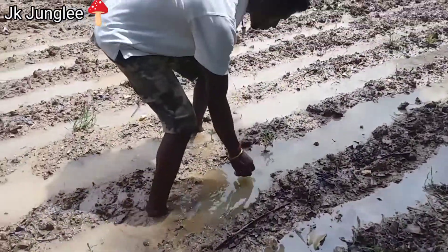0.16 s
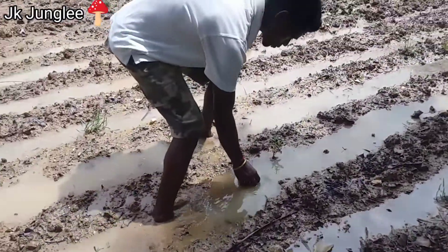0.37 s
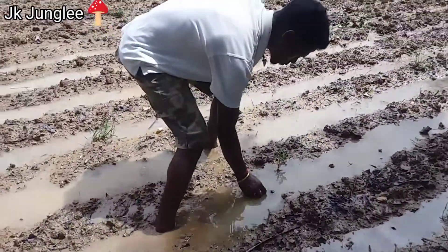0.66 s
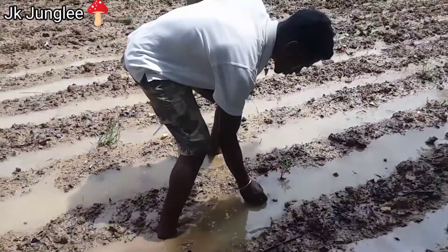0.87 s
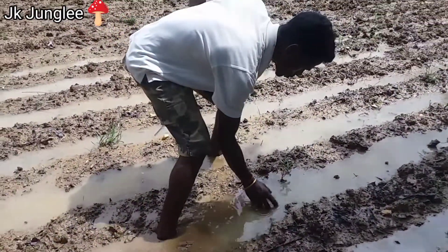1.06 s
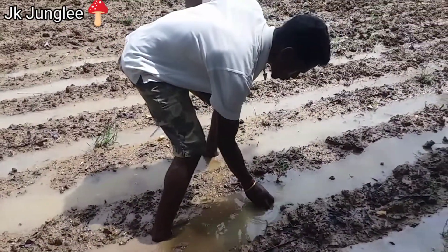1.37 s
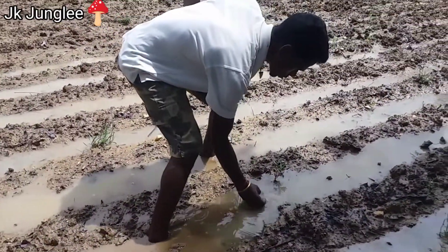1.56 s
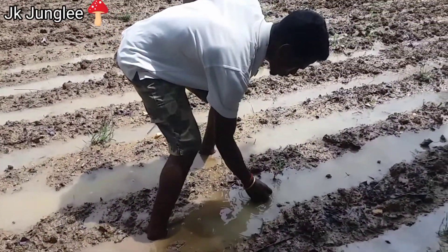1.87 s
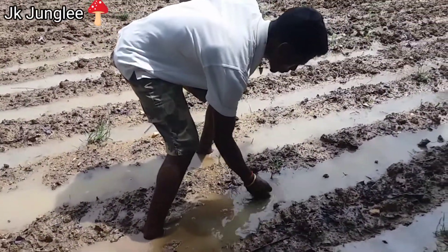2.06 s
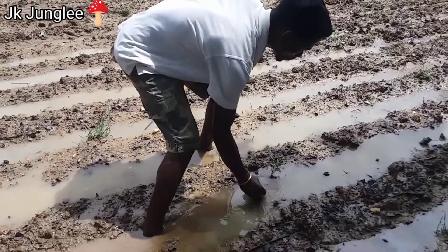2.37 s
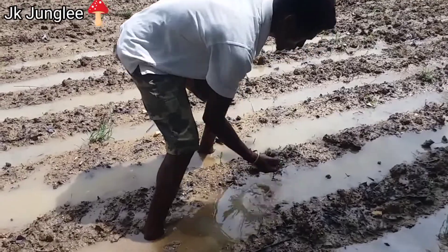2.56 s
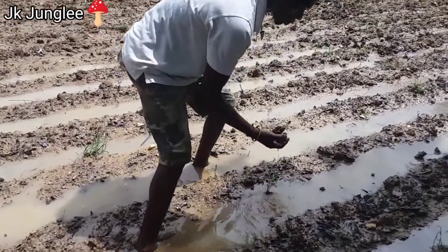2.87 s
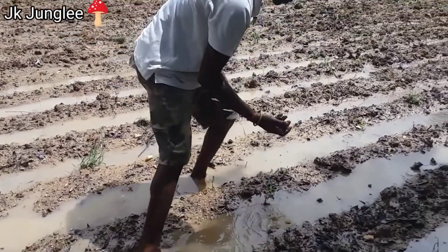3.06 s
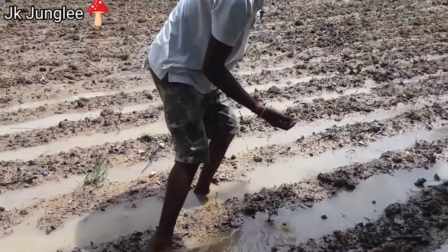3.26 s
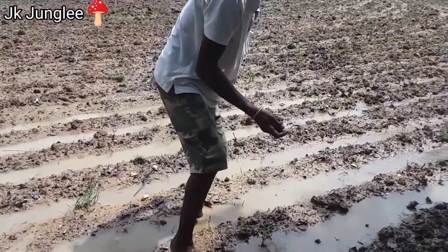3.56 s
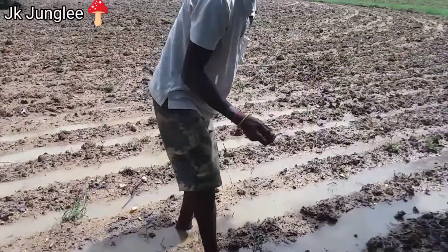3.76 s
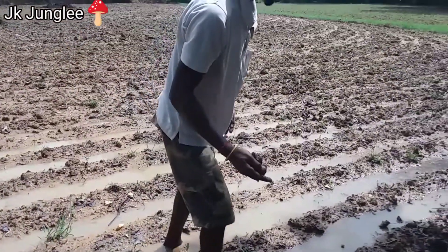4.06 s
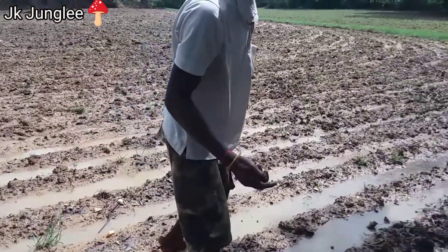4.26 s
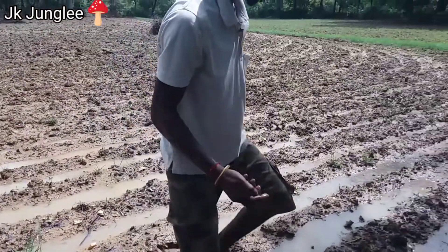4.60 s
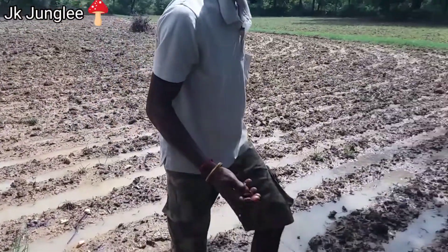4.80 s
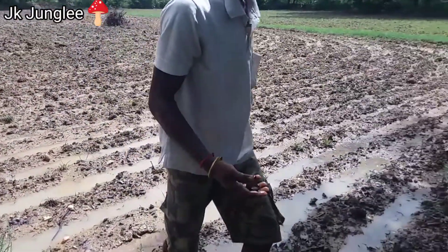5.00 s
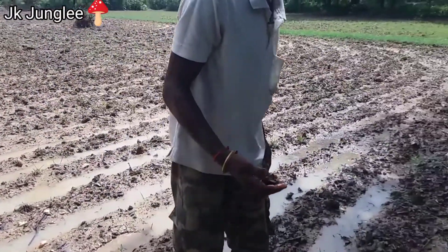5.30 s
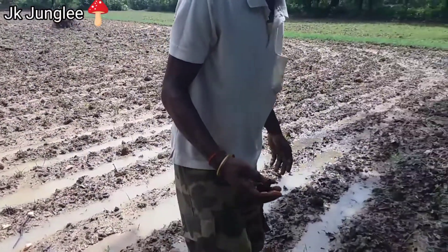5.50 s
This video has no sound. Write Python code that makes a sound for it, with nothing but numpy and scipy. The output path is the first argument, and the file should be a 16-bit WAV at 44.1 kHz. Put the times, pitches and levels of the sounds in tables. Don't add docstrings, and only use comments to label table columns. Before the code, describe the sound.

Calm outdoor ambience with high cricket chirps, a light breeze and distant bird whistles smeared by trees. One small drop ticks early. Past three seconds, bare feet push through shallow muddy water close to the handheld phone: sharp wet pops, a hard glugging knock, short gurgles and bright droplets, in uneven bursts to the end.

```python
import sys
import numpy as np
from scipy import signal
from scipy.fft import rfft, irfft
from scipy.io import wavfile
from scipy.ndimage import uniform_filter1d

SR = 44100
rng = np.random.default_rng(int(sys.argv[2]) if len(sys.argv) > 2 else 0)


def inscribe(sig):
    pcm = np.round(np.clip(np.atleast_2d(sig).T, -1, 1) * 32767)
    wavfile.write(sys.argv[1], SR, pcm.astype(np.int16))


def linear_from_db(decibels):
    return 10 ** (np.asarray(decibels, float) / 20)


N = 248724


def colour(x, points):
    hz, db = np.transpose(points)
    bins = np.log(np.arange(N // 2 + 1) * SR / N + 1)
    return irfft(rfft(x) * linear_from_db(np.interp(bins, np.log(hz), db)), N)


def level(x, db):
    return x * linear_from_db(db) / np.sqrt(np.mean(x ** 2))


def band(hz, width):
    sos = signal.butter(2, [hz - width / 2, hz + width / 2], "band", fs=SR, output="sos")
    return level(signal.sosfilt(sos, rng.standard_normal(N)), 0)


def walk(rate):
    hold = int(SR / rate)
    steps = np.repeat(rng.standard_normal(N // hold + 1), hold)
    return 1.95 * uniform_filter1d(uniform_filter1d(steps, hold), hold)[:N]


def air():
    # hz, density_db (per Hz)
    hush = [(76, -45), (130, 2), (340, 0), (600, -4.5), (1000, -6.5), (1600, -8), (2100, -4), (2830, -12),
            (4480, -16.5), (6300, -13.5), (7300, -30), (8200, -23), (9500, -21.5), (11500, -13.5),
            (15000, -14.5)]
    # time_s, lift_db
    breeze = [
        (0, 4.5),
        (.35, 1),
        (.6, 0),
        (5.64, 2.5),
    ]
    s, lift_db = np.transpose(breeze)
    lift = linear_from_db(np.interp(np.arange(N) / SR, s, lift_db))
    return level(colour(rng.standard_normal(N), hush), -57.5) * lift


def wind():
    # hz, density_db (per Hz)
    wind_colour = [(25, -46), (45, -7), (65, 2), (100, 2), (160, -8), (300, -55), (600, -60)]
    # middle_s, length_s, level_db
    gusts = [
        (0.147, 0.3, -55.5),
        (1.185, 0.084, -45),
        (1.39, 0.18, -62),
        (2.585, .2, -64.5),
        (3.995, 0.085, -61),
        (4.416, 0.21, -58),
        (4.666, 0.094, -50.5),
        (5.553, 0.14, -62),
    ]
    rumble = colour(rng.standard_normal(N), wind_colour)
    rumble /= np.sqrt(uniform_filter1d(rumble ** 2, size=3000))
    t = np.arange(N) / SR
    calm_db = -62.5
    swell = linear_from_db(calm_db)
    for mid, length, db in gusts:
        swell = swell + linear_from_db(db) * np.exp(-(2 * (t - mid) / length) ** 2)
    return swell * linear_from_db(1.7 * walk(21.98)) * rumble


def chirps(table, length, hz, width, strokes_hz, sharp, uneven, sweep):
    out, blur = np.zeros(N), band(hz, width)
    for mid, db in table:
        span = slice(int((mid - length) * SR), int((mid + length) * SR))
        t = np.arange(span.start, span.stop) / SR - mid
        phase = np.pi * strokes_hz * t
        strokes = np.abs(np.cos(phase)) ** sharp * (1 + uneven * np.cos(phase))
        wing = np.sin(2 * np.pi * hz * t + sweep * np.cos(2 * phase)) + .5 * blur[span]
        envelope = np.exp(-(2 * t / length) ** 4)
        out[span] += linear_from_db(db + 1.0) * envelope * strokes * wing
    return out


def crickets():
    # middle_s, level_db
    high_cricket = [(.46, -61), (.98, -62.5), (1.5, -58), (1.94, -57), (2.4, -64), (2.87, -59),
                    (3.33, -57.5), (3.78, -59.5), (4.25, -57.5), (4.84, -61), (5.38, -61)]
    # middle_s, level_db
    low_cricket = [
        (.755, -62),
        (1.64, -60.5),
        (2.57, -64),
        (3.469, -59),
        (4.469, -60),
        (5.247, -56),
    ]
    # middle_s, length_s, change_db
    lulls = [
        (.43, 0.11, -6),
        (0.817, 0.29, -7.5),
        (1.363, 0.27, -4),
        (1.803, 0.048, -2),
        (2.083, 0.11, -6.5),
        (2.393, 0.18, -0.5),
        (2.947, 0.19, -1),
        (3.8, 0.15, 0.5),
    ]
    t = np.arange(N) / SR
    pair_gap_s, second_db = .128, 1
    pairs = low_cricket + [(s + pair_gap_s, db + second_db) for s, db in low_cricket]
    near = chirps(high_cricket, .12, hz=7200, width=500, strokes_hz=68, sharp=4.0, uneven=.3, sweep=3)
    near += chirps(pairs, .09, hz=6290, width=300, strokes_hz=88, sharp=2.5, uneven=0, sweep=1.2)

    trill_db = -72 - 20.0 * (t - .9) ** 2 + 5.0 * np.cos(2 * np.pi * 14 * t)
    trill = linear_from_db(trill_db) * band(2810, 120)

    lull_db = sum(db * np.exp(-(2 * (t - mid) / length) ** 2) for mid, length, db in lulls)
    chorus = linear_from_db(-63 + lull_db + 0.92 * walk(60)) * band(5610, 680)
    chorus += linear_from_db(-70.5 + 2.0 * walk(29.55)) * band(7016, 560)
    return near + trill + chorus


def whistle(note, start, lift_db):
    s, hz, db = np.transpose(note)
    t = np.arange(s[0], s[-1], 1 / SR)
    edge = np.clip(np.minimum(t - s[0], s[-1] - t) / 0.0015, 0, 1)
    pitch = uniform_filter1d(np.interp(t, s, hz), size=600, mode="nearest")
    tone = np.sin(2 * np.pi * np.cumsum(pitch) / SR)
    out, first = np.zeros(N + 2 * SR), int((1 + start + s[0]) * SR)
    out[first:first + len(t)] = edge * linear_from_db(np.interp(t, s, db) + lift_db) * tone
    return out[:N + SR]


def bird():
    # time_s (from the song's start), pitch_hz, level_db
    song = [
        [(0, 2036, -57), (.03, 2010, -48), (.08, 1880, -54), (.12, 2012, -44), (.16, 1957, -48),
         (.19, 1751, -50), (.22, 1620, -59)],
        [(.37, 2053, -49), (.4, 2245, -53.5), (.44, 2185, -48.5), (.48, 1980, -48.5), (.505, 1694, -47.5),
         (.53, 1419, -59), (.56, 1277, -57)],
        [(.59, 1844, -51), (.635, 1804, -45.5), (.67, 1725, -54), (.7, 1580, -63.5)],
    ]
    # start_s, then the lift_db of each note
    sings = [
        (-.384, 3.4, 3.7, 4),
        (1.258, 2.6, 2.4, -0.5),
        (2.85, 1.1, 2, -2.5),
    ]
    # start_s, length_s, from_hz, to_hz,
    # level_db
    far_bird = [
        (0.419, .06, 1550, 1396, -60),
        (2.611, 0.2, 2180, 2263, -59),
        (2.772, 0.029, 2200, 1940, -55),
        (2.866, 0.22, 2070, 2070, -59),
        (3.251, 0.183, 2290, 2250, -56),
        (4.048, 0.22, 2260, 2240, -57),
        (5.513, 0.14, 2250, 2410, -50.5),
    ]
    out = np.zeros(N + SR)
    for start, *lifts in sings:
        for note, db in zip(song, lifts):
            out += whistle(note, start, db)
    for start, length, from_hz, to_hz, db in far_bird:
        middle_hz = (from_hz + 2 * to_hz) / 3
        glide = [(0, from_hz, -5), (length / 2, middle_hz, 0), (length, to_hz, -5)]
        out += whistle(glide, start, db)

    t = np.arange(2 * SR) / SR
    t60_s, slap_s, smear_db, slap_db = 1.4, .29, -2.5, -15.5
    fade = np.exp(-np.log(1000) * t / t60_s) * (t > .004)
    slap = np.exp(-((t - slap_s) / .03) ** 2)
    shape = linear_from_db(smear_db) * fade / np.sqrt(np.sum(fade ** 2))
    shape += linear_from_db(slap_db) * slap / np.sqrt(np.sum(slap ** 2))
    echo = np.zeros(N)
    for _ in range(4):
        sway = np.resize(walk(130), len(out))
        echo += signal.fftconvolve(out * sway, shape * rng.standard_normal(len(t)))[SR:N + SR] / 2
    flutter = linear_from_db(2.4 * walk(90))
    return out[SR:] * flutter + echo


def ring(events, glide, rise, fall, size=N):
    out = np.zeros(size + 2 * SR)
    for s, db, hz, cycles in events:
        before, after = int(2 * rise * cycles / hz * SR), int(6 * fall * cycles / hz * SR)
        u = np.arange(-before, after) * hz / SR / cycles
        shape = np.exp(np.where(u < 0, -(u / rise) ** 2, -u / fall))
        start = SR + int(s * SR) - np.sum(u < 0)
        tone = np.cos(2 * np.pi * cycles * u * (1 + glide * u / 2))
        out[start:start + len(u)] += linear_from_db(db) * shape * tone
    return out[SR:SR + size]


def swarm(low_hz, high_hz, rate):
    for hz in np.geomspace(low_hz, high_hz, num=8):
        when, size, sign = rng.random((3, int(rate / 8 * N / SR)))
        size_db = np.minimum(-3.2 * np.log(1 - size), 11)
        yield hz, np.bincount((when * N).astype(int), linear_from_db(size_db) * np.sign(sign - .5), N)


def stir():
    # start_s, hold_s, level_db, depth_db, spatter_db
    sloshes = [(2.452, 0.17, -67.5, 8.5, 6), (3.046, 0.028, -61, -19, 11.5), (3.143, .02, -52, -11, -6),
               (3.216, 0.057, -46.5, -9, -6), (3.288, 0.28, -48.5, 4, 0), (3.84, 0.13, -50, -8, -7),
               (3.969, 0.11, -47, -6, -12), (4.135, 0.086, -55, -12, -7), (4.296, 0.0076, -32, 0, -8),
               (4.32, 0.035, -47, 1, 0.5), (4.409, 0.019, -49.5, 1, 0), (4.478, .02, -48, -2, -2),
               (4.504, 0.015, -40, -5.5, -3), (4.585, 0.14, -54.5, -26, 2.5),
               (4.948, 0.071, -49.5, -28, 7.5), (5.023, .08, -50.5, 3, -6), (5.126, 0.15, -48.5, -8.5, -6),
               (5.355, 0.055, -46, -3, -6), (5.441, 0.038, -43, 1.5, -8), (5.483, 0.044, -46.5, -9, -9),
               (5.559, 0.055, -51.5, -6, 0.5)]
    attack_s, release_s = 0.002, 0.047
    t, power = np.arange(N) / SR, np.zeros((4, N))
    for start, hold, db, depth_db, spatter_db in sloshes:
        rise = np.clip((t - start) / attack_s, 0, 1)
        decay = np.exp(-np.maximum(t - start - hold, 0) / release_s)
        swarm_db = db + np.array([[depth_db], [0], [0.83 * spatter_db], [spatter_db]])
        power += (linear_from_db(swarm_db) * rise * decay) ** 2
    return np.sqrt(power)


def wash():
    # low_hz, high_hz, births_per_s, ring_cycles, offset_db
    swarms = [
        (505, 1170, 600, 2.8, -7),
        (1157, 2536, 950, 5.6, -3.5),
        (3040, 6080, 1100, 6, -9),
        (8400, 19000, 2200, 1.9, -16),
    ]
    out, start = np.zeros(N), int(2.4 * SR)
    for gain, (low_hz, high_hz, rate, cycles, offset_db) in zip(stir(), swarms):
        crowd = np.zeros(N - start)
        for hz, kicks in swarm(low_hz, high_hz, rate):
            one = ring([(.01, 0, hz, cycles)], glide=0.099, rise=0.25, fall=0.82, size=SR // 25)
            crowd += signal.oaconvolve(kicks[start:], one)[:N - start]
        swell = gain * linear_from_db(offset_db + 2.0 * walk(35))
        out[start:] += swell[start:] * level(crowd, 0)
    return out


def shed(events, later_s, octaves, below_db):
    wait, step = rng.random((len(events), 2)).T
    s, db, hz, cycles = np.transpose(events)
    pitch = hz * 2 ** (octaves * (step - .5))
    return np.transpose([s + later_s * wait, db - below_db, pitch, 1.46 * cycles])


def spray():
    # start_s, peak_db
    ticks = [(2.689, -42.5), (3.301, -42.5), (3.432, -48), (3.49, -48), (3.517, -45), (3.5882, -42),
             (3.687, -48.5), (3.893, -48), (3.987, -49), (4.0302, -49), (4.0528, -44), (4.13, -48),
             (4.169, -50.5), (4.296, -40), (4.5176, -39.5), (4.958, -36.5), (5.026, -46), (5.072, -49),
             (5.486, -50)]
    out, n = np.zeros(N), np.arange(600)
    sos = signal.butter(1, [3000, 14000], "band", fs=SR, output="sos")
    for s, db in ticks:
        burst = rng.standard_normal(600) * np.exp(-n / (.0025 * SR)) * np.minimum(n / 40, 1)
        start = int(s * SR)
        out[start:start + 600] += linear_from_db(db + 5) * signal.sosfilt(sos, burst)[:N - start]
    return out


def water():
    # crest_s, peak_db, pitch_hz, length_cycles
    pockets = [(3.1668, -38, 1430, 3), (3.2172, -19.5, 1007, 2.7), (3.2646, -16, 1080, 2.4),
               (3.279, -32, 880, 2.6), (3.298, -35.5, 795, 4.5), (3.3304, -38.5, 330, 2.7),
               (3.3644, -39.5, 690, 10), (3.4347, -34, 1080, 2.7), (3.4586, -28.5, 940, 4.7),
               (3.6377, -31.5, 1300, 2.5), (3.8951, -36.5, 1040, 2.8), (3.9894, -33.5, 1040, 5.2),
               (4.2972, -18.5, 1000, 1.55), (4.2975, -35, 200, 0.42), (4.3052, -37, 1250, 8.9),
               (4.3147, -22, 1420, 1.6), (4.3446, -33.6, 503, 3.1), (4.3566, -32, 1100, 3),
               (4.3636, -35.5, 400, 1.4), (4.379, -34, 1290, 3.9), (4.412, -36, 1010, 3),
               (4.5172, -20.5, 1060, 2.2), (4.5287, -26, 1040, 2.7), (4.5691, -38, 1100, 6.6),
               (4.605, -34.5, 1150, 4.7), (5.2087, -34.5, 1190, 1.5), (5.3828, -39.5, 894, 6.5),
               (5.4341, -34.5, 1020, 3.9), (5.4486, -28.5, 547, 1.7), (5.481, -36.5, 850, 5.5)]
    # crest_s, peak_db, pitch_hz
    bubbles = [(2.494, -48.5, 1680), (2.558, -45.5, 2530), (3.1533, -24, 1860), (3.2346, -27, 1800),
               (3.2547, -40, 2130), (3.283, -29.5, 2030), (3.3584, -39, 2000), (3.4796, -37, 2650),
               (3.7112, -41.5, 2520), (3.87, -40, 1630), (3.912, -39, 1590), (3.9331, -40, 2500),
               (3.9706, -38, 1990), (4.009, -30, 1740), (4.0324, -33, 2320), (4.298, -22, 2360),
               (4.5051, -39, 2480), (4.9532, -32.5, 1720), (4.9875, -31.5, 2320), (5.02, -38, 2000),
               (5.0334, -33.5, 2220), (5.055, -36.5, 1940), (5.0824, -41, 1980), (5.162, -41.5, 1420),
               (5.2448, -35, 2200), (5.3626, -25, 1910), (5.4135, -32, 2000), (5.447, -31, 1660)]
    # crest_s, peak_db, pitch_hz
    drops = [(.145, -45, 3270), (2.33, -54, 3440), (2.6928, -35, 4200), (2.905, -38, 4600),
             (3.074, -31.5, 5100), (3.4112, -39, 4070), (3.515, -34, 4430), (3.5908, -35, 3300),
             (3.491, -30.5, 4830), (3.64, -42, 2840), (3.6887, -37, 4080), (3.9141, -36.5, 4430),
             (3.9954, -32.5, 4160), (4.104, -40.5, 4000), (4.299, -29, 4300), (4.3174, -29.5, 4490),
             (4.3653, -33, 4200), (4.4, -38, 4460), (4.4875, -36.5, 3950), (4.53, -37, 4660),
             (4.959, -30, 5300), (4.9664, -31, 5040), (4.9792, -29, 5700), (5.0293, -32, 4950),
             (5.561, -39, 5000)]
    bubble_cycles, drop_cycles = 4.5, 4.9
    pops = pockets + [(*row, bubble_cycles) for row in bubbles] + [(*row, drop_cycles) for row in drops]
    out = ring(pops, glide=0.086, rise=0.5, fall=0.5) + wash()
    fragments = shed(pops, later_s=.008, octaves=1.0, below_db=8.5)
    out += ring(fragments, glide=0.072, rise=0.54, fall=0.28)
    out += spray()
    t = np.arange(SR // 10) / SR
    smear = rng.standard_normal(len(t)) * np.exp(-np.log(1000) * t / 0.046) * (t > .0015)
    smear /= np.sqrt(np.sum(smear ** 2))
    return out + linear_from_db(-8.5) * signal.fftconvolve(out, smear)[:N]


def scene():
    return np.tile(air() + wind() + crickets() + bird() + water(), (2, 1))


def roll_off(x):
    return signal.sosfilt(signal.butter(12, 16640, fs=SR, output="sos"), x)


def record(dry):
    # hz, left_minus_right_db
    ports = [(700, -.3), (2200, -1), (3300, -4), (4800, -9.2), (5400, -10.1), (6400, -8.3), (7400, -5),
             (8000, -.5), (9000, .2), (10200, 1.8), (11600, 2.1), (12800, .2), (13500, 0)]
    # hz, level_db
    unrelated = [(60, -45), (150, -32), (1200, -30), (2500, -22), (7000, -16), (8300, -32), (10200, -14),
                 (11800, -14), (13000, -36)]
    scatter = rng.standard_normal(400) * np.exp(-np.arange(400) / 90)
    scatter /= np.sqrt(np.sum(scatter ** 2))
    apart = colour(signal.fftconvolve(dry[0], scatter)[:N], unrelated)
    ratio = [(hz, linear_from_db(db)) for hz, db in ports]
    left = colour(dry[0], [(hz, 20 * np.log10(2 * r / (1 + r))) for hz, r in ratio])
    right = colour(dry[1], [(hz, 20 * np.log10(2 / (1 + r))) for hz, r in ratio])
    top_hz = 15700
    lowpass = signal.ellip(8, .2, 70, top_hz, fs=SR, output="sos")
    pair = signal.sosfilt(lowpass, [left + apart, right - apart])
    return roll_off(pair - .0011)


dry = scene()
out = record(dry)
inscribe(out)
```